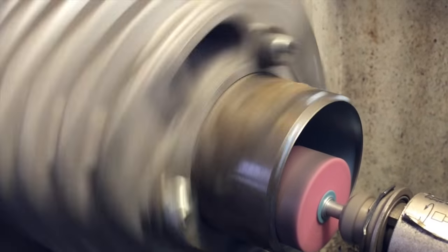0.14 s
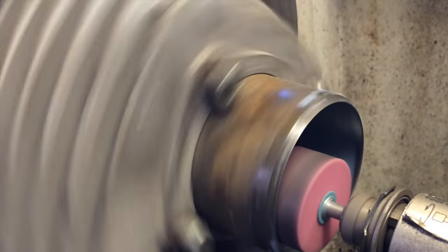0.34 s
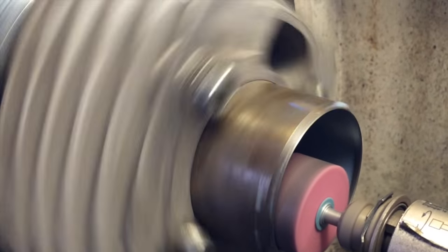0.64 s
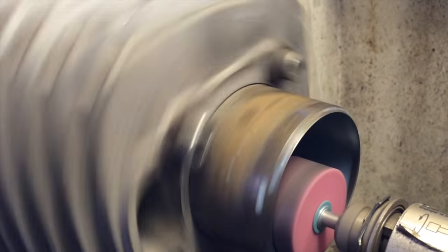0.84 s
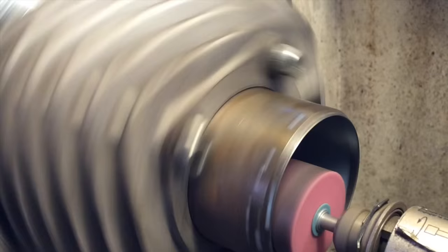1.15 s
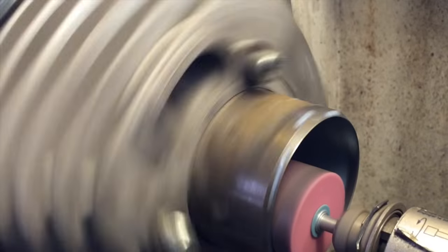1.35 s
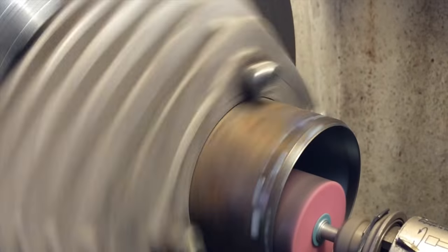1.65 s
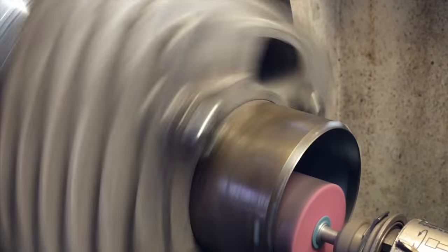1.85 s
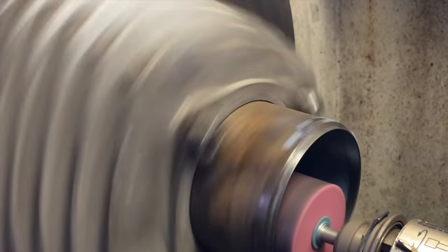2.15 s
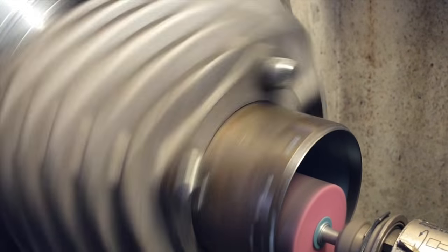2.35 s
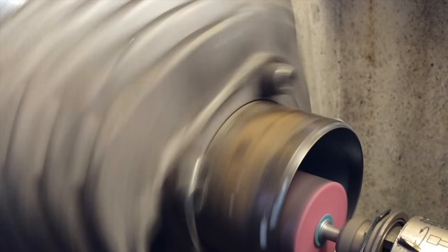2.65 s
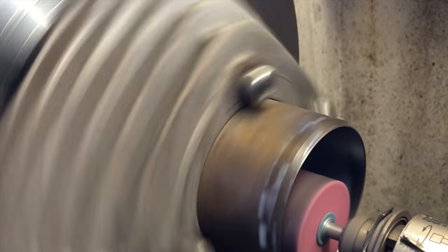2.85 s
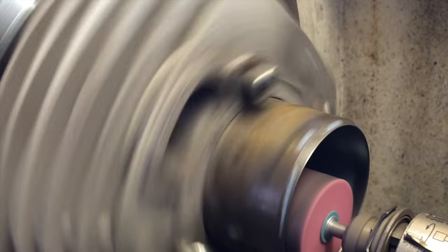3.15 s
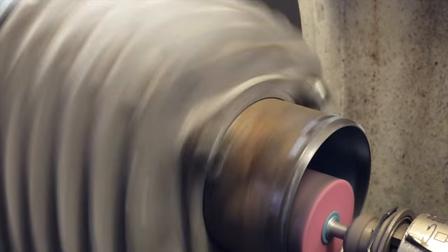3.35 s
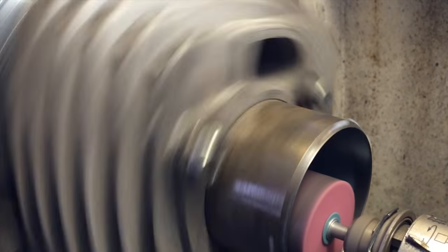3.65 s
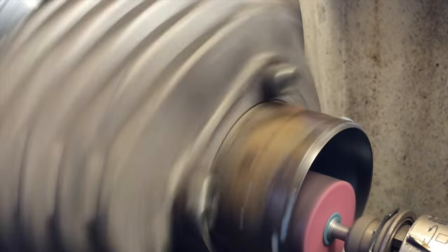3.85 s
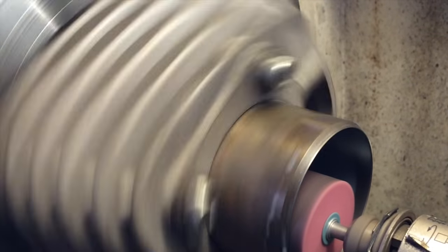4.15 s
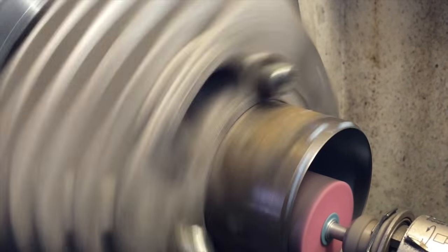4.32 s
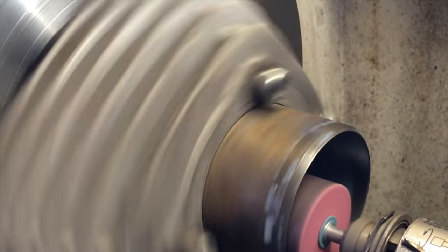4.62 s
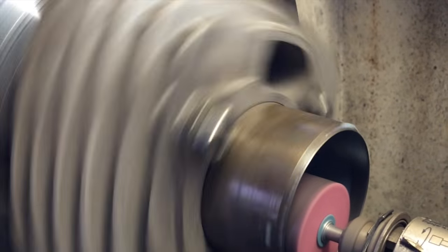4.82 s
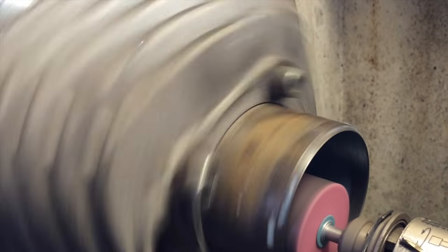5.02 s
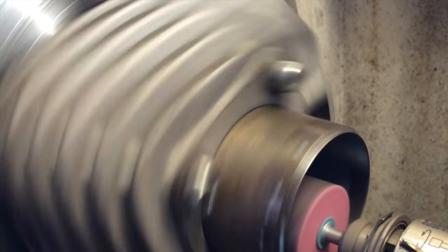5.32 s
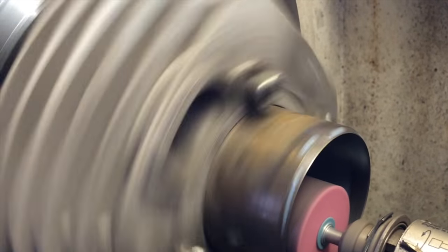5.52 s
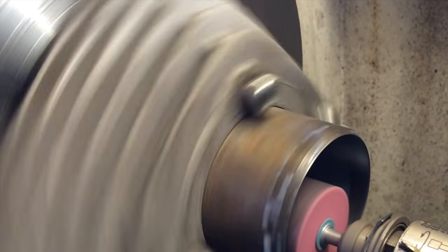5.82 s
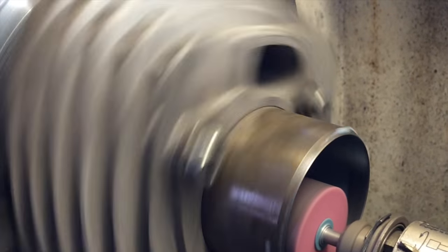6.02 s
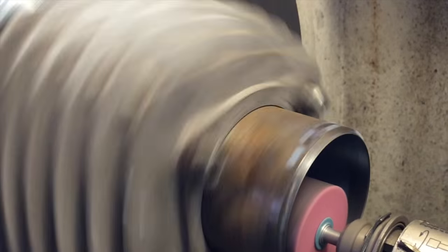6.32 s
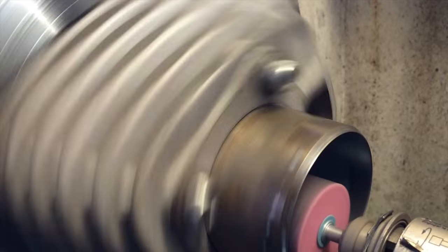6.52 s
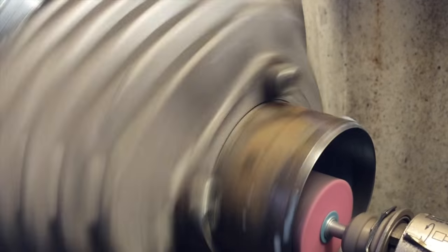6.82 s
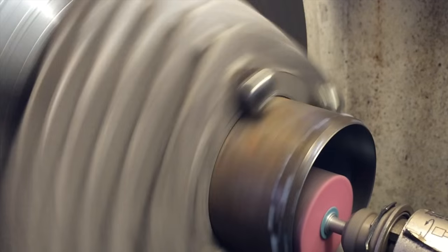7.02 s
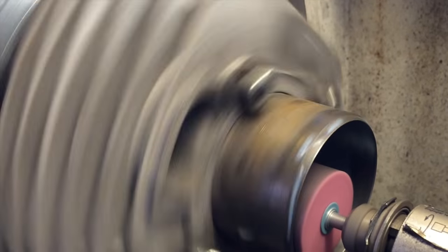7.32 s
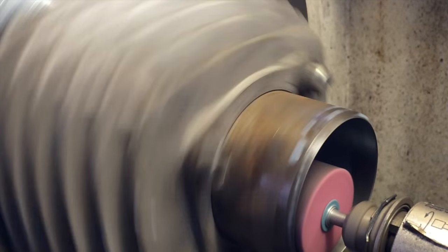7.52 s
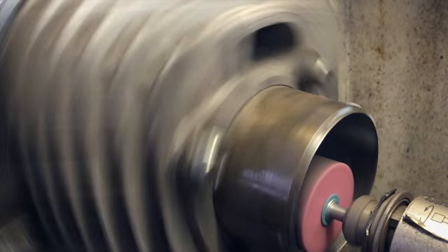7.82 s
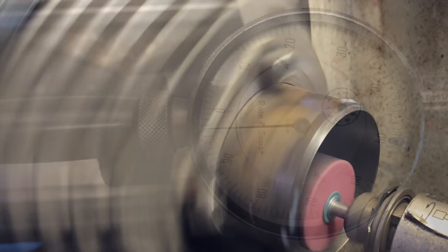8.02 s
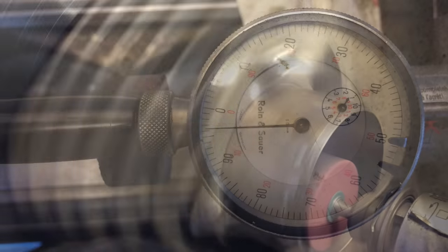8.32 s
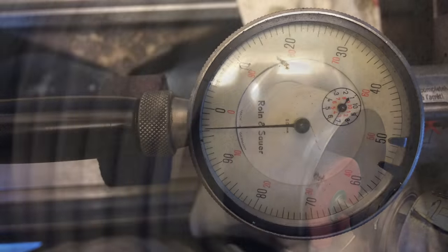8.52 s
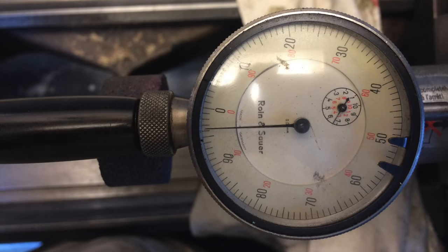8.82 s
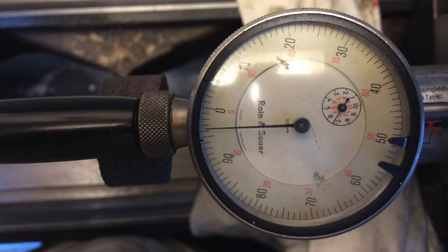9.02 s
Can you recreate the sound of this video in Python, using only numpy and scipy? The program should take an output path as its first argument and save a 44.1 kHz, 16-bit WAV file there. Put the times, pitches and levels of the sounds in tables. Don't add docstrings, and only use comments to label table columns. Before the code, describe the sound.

Steady abrasive hiss from a grinding stone on rotating hollow metal, already running at the start. The tone has a fast, fine throb and a cyclic shimmer as different rings pass by, with short glassy squeals and pings. Underneath are a low lathe rumble and a weak electric whine. Occasional dull puffs of air bump the close, essentially mono microphone from two seconds, before the final second fades smoothly away.

```python
import sys
import numpy as np
from scipy import signal
from scipy.fft import rfft, irfft
from scipy.io import wavfile
from scipy.ndimage import uniform_filter1d, map_coordinates

SR = 44100
rng = np.random.default_rng(int(sys.argv[2]) if len(sys.argv) > 2 else 0)


def natural_amplitude(level_db):
    exponent = np.asarray(level_db, float) / 20
    return 10 ** exponent


def output_pcm(signal):
    pcm = np.clip(np.atleast_2d(signal).T, -1, 1) * 32767
    wavfile.write(sys.argv[1], SR, np.round(pcm).astype(np.int16))


N = 403943
TIME = np.arange(N) / SR

LATHE_HZ, STONE_HZ = 1.6823, 92.87
TURNS = 14
BEAM_LAG = .04
TOP_HZ = 15290

# [f/Hz, width/Hz, level/dB]
BORE = [(459, 75, -61.8), (539, 154, -60.4), (724, 92, -56.0), (942, 44, -60.5), (1343, 154, -51.8),
        (1382, 37, -54.3), (1814, 166, -52.0), (2230, 67, -61.0), (2590, 152, -52.9), (2857, 168, -51.8),
        (3072, 155, -49.8), (3290, 203, -50.0)]
# [f/Hz, width/Hz, level/dB]
RINGS = [(3880, 16, -61.3), (3963, 15, -63.6), (4135, 79, -55.3), (4830, 31, -56.0), (4982, 33, -59.3),
         (5106, 30, -62.6), (5354, 81, -61.1), (5925, 217, -51.1), (6230, 45, -56.5), (6494, 299, -50.3),
         (6783, 32, -55.5), (7004, 116, -53.9), (7260, 111, -56.7), (7527, 48, -58.2), (7812, 35, -58.3),
         (8240, 120, -57), (8519, 133, -56.4), (8789, 109, -54.6), (9061, 118, -56.2), (9373, 44, -62.1),
         (9659, 22, -57), (9720, 260, -55.5), (10133, 42, -62.6), (10595, 72, -59.6), (10886, 146, -60.6),
         (11224, 27, -68.4), (11674, 128, -65.2), (12507, 299, -59.6), (13239, 145, -64.4),
         (13550, 221, -57.4)]


def evened(x):
    return x / np.sqrt(np.mean(x ** 2) + 1e-20)


def read(points, hz):
    f, value = np.transpose(points)
    return np.interp(np.log(hz + 1), np.log(f + 1), value)


def drift(rate):
    knots = rng.standard_normal(600)
    return np.interp(TIME * rate, np.arange(600), knots) * np.sqrt(1.5)


def ringing(hz, width):
    r = np.exp(-np.pi * width * 1.55 / SR)
    noise = rng.standard_normal(N) + 1j * rng.standard_normal(N)
    slow = signal.lfilter([1], [1, -2 * r, r * r], noise)
    return evened((slow * np.exp(2j * np.pi * hz * TIME)).real)


def shaped(spectrum, size, patchy_db, turning_db, flicker_db):
    hop = size // 4
    frames, hz = N // hop + 5, np.fft.rfftfreq(size, 1 / SR)
    a, b, patches = rng.standard_normal((frames, len(hz), 3)).T
    patches = uniform_filter1d(patches, size=5, axis=0)
    patches = evened(uniform_filter1d(patches, size=7, axis=1))

    around = evened(uniform_filter1d(rng.standard_normal((len(hz), 14)), size=3, axis=0))
    around -= around.mean(axis=1, keepdims=True)
    angle = np.arange(frames) * hop / SR * LATHE_HZ % 1 * 14
    bins, angle = np.meshgrid(np.arange(len(hz)), angle, indexing="ij")
    turning = map_coordinates(around, [bins, angle], order=1, mode="grid-wrap")
    turning *= np.clip(hz / 8000, 0, 1)[:, None]

    flicker = evened(uniform_filter1d(rng.standard_normal(frames), size=3))
    db = read(spectrum, hz)[:, None] + patchy_db * patches + turning_db * turning + flicker_db * flicker
    z = (a + 1j * b) * natural_amplitude(db)
    return evened(signal.istft(z, nperseg=size, noverlap=size - hop)[1][:N])


def swing(curve):
    s, db = np.transpose(curve)
    return natural_amplitude(np.interp(TIME, s, db - db.mean()) + .8 * drift(5.))


def shop_rumble():
    # [f/Hz, level/dB per Hz]
    rumble_spectrum = [(15, -43), (25, -15), (57, -9), (70, 2.5), (171, 0.5), (204, -5), (246, -6.5),
                       (300, -1.5), (390, -9), (660, -120)]
    # [t/s, level/dB]
    draught = [(0.0, -68.5), (0.29, -71), (1.23, -71), (2.45, -69), (4.23, -71), (4.99, -68.5), (5.41, -72),
               (6.04, -68.5), (6.46, -71.5), (8.0, -71.5)]
    rumble = shaped(rumble_spectrum, size=1024, patchy_db=3.0, turning_db=-5.0, flicker_db=1.0)
    return natural_amplitude(-66.5) * swing(draught) * rumble


def motor():
    # [multiple of rotor speed, level/dB]
    whine_orders = [(1, -68), (2, -68), (3, -68), (5, -70), (6, -65), (12, -66), (24, -67), (30, -74)]
    rotor_hz = 487.6 * (1 + .0006 * drift(3.))
    turns = np.cumsum(rotor_hz) / SR
    whine = np.zeros(N)
    for k, db in whine_orders:
        whine += natural_amplitude(db + 2.8 * drift(6.)) * np.cos(2 * np.pi * (k * turns + rng.random()))
    hum = natural_amplitude(-80) * np.cos(2 * np.pi * STONE_HZ * TIME)
    return np.sqrt(2) * (whine + hum)


def puffs():
    # [t/s, peak level/dB]
    puff_events = [(1.894, -44.4), (2.426, -49.7), (2.486, -55.1), (2.651, -49.9), (3.3, -54.5),
                   (4.408, -52.9), (5.13, -54.9), (5.922, -57), (7.141, -48.9), (7.592, -51.9),
                   (7.913, -54.7)]
    out = np.zeros(N)
    lead_s, push_s = .02, .005
    u = np.arange(-lead_s, .04, 1 / SR) / push_s
    push = np.exp(-(u / .3) ** 2) - .4 * np.exp(-((u - .9) / .6) ** 2)
    for s, db in puff_events:
        at = round((s - lead_s) * SR)
        out[at:at + len(u)] += natural_amplitude(db + 4) * push
    return out


def bore():
    return sum(natural_amplitude(db + 1.25 * drift(15.)) * ringing(hz, width) for hz, width, db in BORE)


def beams():
    strong_beams = {3880: (.85, 8.6, .25), 4830: (.75, 6.0, .55), 5925: (.8, 6.3, .5), 6230: (.6, 7.2, .05),
                    6494: (.2, 5.4, .35), 6783: (.95, 12, .65), 7004: (.2, 4.5, 0), 7527: (.1, 5, .95),
                    7812: (.75, 4.7, .25), 8240: (.45, 5.2, .75), 9061: (.1, 4.8, .4), 9659: (0, 4.3, .7),
                    10133: (.05, 5.7, .35), 11224: (0, 5.7, .15), 12507: (.8, 6.2, .65)}
    chance = rng.random((len(RINGS), 2))
    return [strong_beams.get(hz, (a, 3, b)) for (hz, width, db), (a, b) in zip(RINGS, chance)]


def beam(angle, sharp):
    return np.exp(sharp * (np.cos(2 * np.pi * (LATHE_HZ * TIME - angle)) - 1))


def casting(aims):
    out = np.zeros(N)
    for (hz, width, db), (main, main_db, second) in zip(RINGS, aims):
        lobes = beam(main + BEAM_LAG, 12.) + .6 * beam(second + BEAM_LAG, 12.)
        lobes_db = 1.2 * main_db * lobes
        out += natural_amplitude(db) * ringing(hz, width) * evened(natural_amplitude(lobes_db + 1.83 * drift(12.)))
    return out


def glints(aims):
    rows = []
    scatter = .25
    for (hz, width, db), (main, main_db, second) in zip(RINGS, aims):
        sings, late, off = rng.random((TURNS, 3)).T
        if hz in (6783, 9659):
            continue
        times = (np.arange(TURNS) + main + BEAM_LAG + scatter * (2 * late - 1)) / LATHE_HZ
        pitches = hz + width * (off - .5)
        glint_db = min(db + 8, -49.5)
        rows += [(t, glint_db, f) for t, f, p in zip(times, pitches, sings) if p < .55]
    for hz, width, db in BORE[4:]:
        when, off = rng.random((14, 2)).T
        rows += [(t, db + 1, f) for t, f in zip(.2 + 8.3 * when, hz + width * (off - .5))]
    return rows


def flares(aims):
    # [t/s, level/dB]
    squeals = [(0.522, -45.1), (0.579, -38.3), (1.123, -47.0), (1.173, -37.5), (1.733, -43.4),
               (2.305, -46.8), (2.898, -46.0), (2.963, -45.1), (3.487, -46.1), (4.142, -43.6),
               (4.743, -44.2), (5.332, -45.5), (5.869, -46.5), (5.92, -43.7), (6.461, -44.1),
               (6.516, -45.3), (7.121, -43.5), (7.714, -50), (8.305, -49.5)]
    # [t/s, level/dB, f/Hz]
    pings = [(0.017, -46.7, 6977), (0.036, -49, 9655), (0.372, -44.9, 6230), (1.051, -47.2, 7810),
             (1.074, -46.5, 5967), (1.663, -44.7, 5975), (1.823, -49, 9655), (2.215, -47.4, 7805),
             (3.426, -44.3, 4833), (4.068, -47, 5932), (4.317, -46.8, 4177), (4.66, -45.2, 3877),
             (4.812, -47.7, 8485), (5.126, -45.4, 6236), (5.51, -45.5, 5824), (5.84, -46.0, 4822),
             (6.008, -47.7, 8749), (6.473, -46.3, 8829), (6.782, -44, 4136), (6.94, -47.1, 9655),
             (6.969, -45, 4146), (7.025, -47.5, 5949), (7.155, -47.2, 9655), (7.892, -48.0, 9655),
             (7.62, -47, 5950), (7.993, -48.2, 7808), (8.24, -47, 3880), (8.824, -45, 3880),
             (0.602, -49, 9665), (1.341, -48.6, 7810)]
    squeal_hz, flare_s, reach_s = 6785, .038, .12
    out = np.zeros(N)
    t = np.arange(-reach_s, reach_s, 1 / SR)
    swell = np.exp(-(t / (.62 * flare_s)) ** 2)
    events = [(s, db, squeal_hz) for s, db in squeals] + list(pings) + glints(aims)
    for s, db, hz in events:
        at = round((s - reach_s) * SR)
        tone = np.sqrt(2) * natural_amplitude(db) * swell * np.cos(2 * np.pi * (hz * t + rng.random()))
        out[max(at, 0):at + len(t)] += tone[max(-at, 0):]
    return out


def grit():
    # [f/Hz, level/dB per Hz]
    hiss_spectrum = [(120, -44.5), (200, -17.5), (320, -12), (620, -12.5), (850, -8), (1150, -2),
                     (2150, -7.5), (3600, -5), (4600, 0.5), (6300, -6.5), (8400, -4.5), (11400, -8),
                     (14300, -11), (15300, -7)]
    return natural_amplitude(-37.5) * shaped(hiss_spectrum, size=1024, patchy_db=1.3, turning_db=3.2, flicker_db=.3)


def throbbing(x):
    # [f/Hz, depth 0-1]
    throb_depth = [(1000, .02), (3000, .045), (6000, .06), (9000, .15), (11000, .06), (14000, .11)]
    hz = np.fft.rfftfreq(N, 1 / SR)
    varying = irfft(rfft(x) * read(throb_depth, hz), N)
    return x + varying * np.cos(2 * np.pi * STONE_HZ * TIME)


def scene():
    aims = beams()
    grinding = throbbing(grit() + casting(aims) + bore() + flares(aims))
    mono = shop_rumble() + motor() + puffs() + grinding
    return np.array([mono, mono])


def starved(x, under_db, from_hz):
    hz, t, z = signal.stft(x, SR, nperseg=2048, noverlap=1536)
    short_db = .7 * np.interp(t, TIME, drift(1.5))
    narrow = uniform_filter1d(abs(z) ** 2, size=5, axis=0)
    narrow = uniform_filter1d(narrow, size=3, axis=1)
    narrow_db = 10 * np.log10(narrow + 1e-20)
    wide_db = uniform_filter1d(narrow_db, size=60, axis=0)
    top_db = 2.8 * (hz[:, None] / TOP_HZ) ** 3
    weak = narrow_db - wide_db < under_db + short_db + top_db
    weak &= (hz > from_hz)[:, None]
    weak |= np.roll(weak, 1, axis=0) | np.roll(weak, 1, axis=1)
    thinned = signal.istft(z * np.where(weak, .05, 1), SR, nperseg=2048, noverlap=1536)[1][:N]
    return irfft(rfft(thinned) * (np.fft.rfftfreq(N, 1 / SR) < TOP_HZ), N)


def slips():
    # [t/s, low edge f/Hz, high edge f/Hz, level/dB]
    slip_events = [
        (.6885, 11700, 13200, -57),
        (.8046, 6900, 8300, -55),
        (1.0832, 11000, 12500, -57),
        (1.594, 4500, 5800, -51),
        (2.105, 5600, 7000, -51),
        (2.523, 6900, 8400, -53),
        (3.730, 4100, 5800, -51),
        (5.031, 4500, 5800, -54),
        (7.051, 4100, 5300, -48),
    ]
    side, hz = np.zeros(N), np.fft.rfftfreq(2048, 1 / SR)
    window = signal.windows.kaiser_bessel_derived(2048, 4 * np.pi)
    for s, low, high, db in slip_events:
        burst = irfft(rfft(rng.standard_normal(2048)) * ((hz > low) & (hz < high)))
        at = round(s * SR) - 1024
        side[at:at + 2048] += natural_amplitude(db) * evened(burst * window)
    return side * np.array([[1], [-1]])


def low_pass(x):
    return signal.sosfilt(signal.butter(12, 15310, fs=SR, output="sos"), x)


def record(dry):
    hz = np.fft.rfftfreq(N, 1 / SR)
    roll_off = 1 - 1 / (1 + (hz / 38) ** 4)
    heard = irfft(rfft(dry[0]) * roll_off, N)
    thinned = starved(heard, under_db=-6.6, from_hz=5200)
    fade_start, fade_end = 7.883, 8.877
    u = np.clip((TIME - fade_start) / (fade_end - fade_start), 0, 1)
    faded = thinned * np.cos(np.pi / 2 * u) ** 2.08 * (u < 1)
    return low_pass(faded + slips())


dry = scene()
out = record(dry)
output_pcm(out)
```